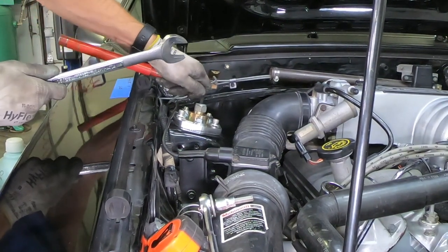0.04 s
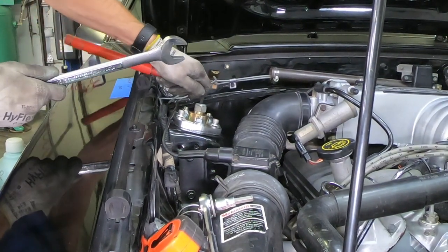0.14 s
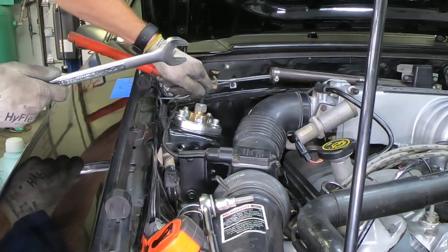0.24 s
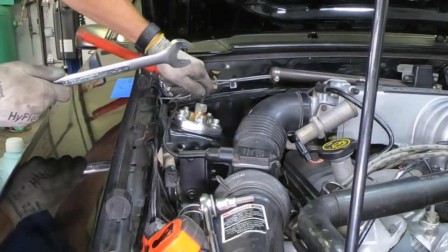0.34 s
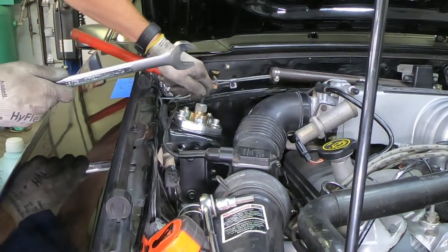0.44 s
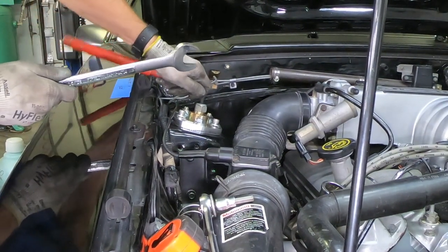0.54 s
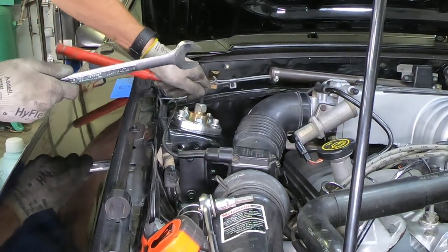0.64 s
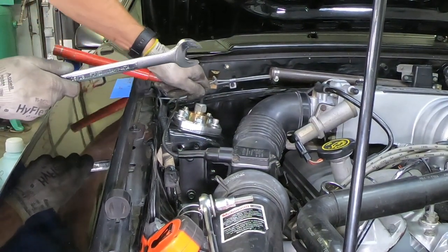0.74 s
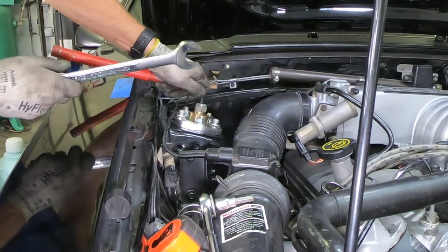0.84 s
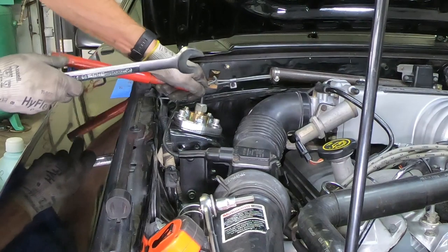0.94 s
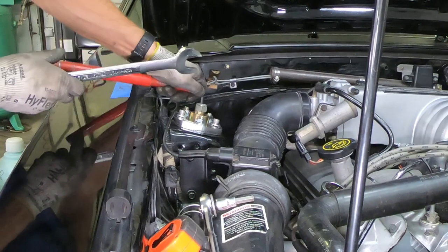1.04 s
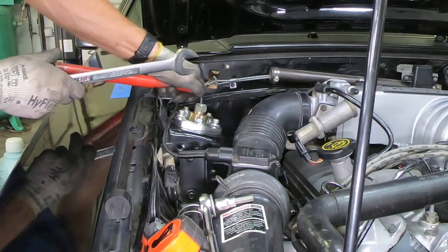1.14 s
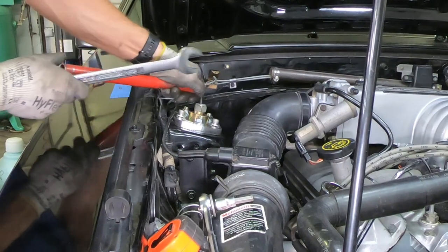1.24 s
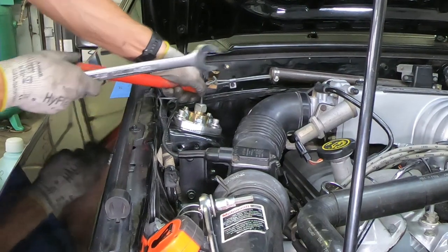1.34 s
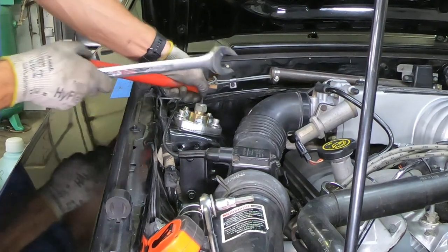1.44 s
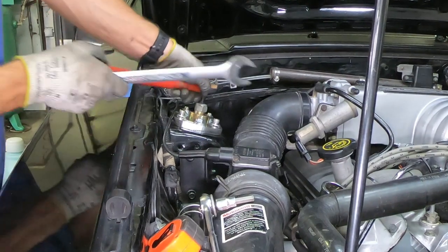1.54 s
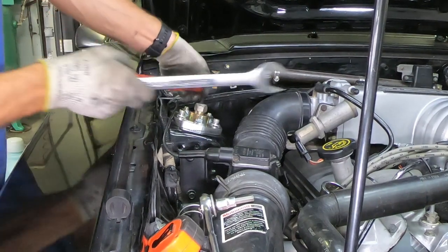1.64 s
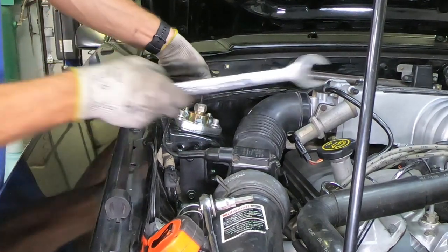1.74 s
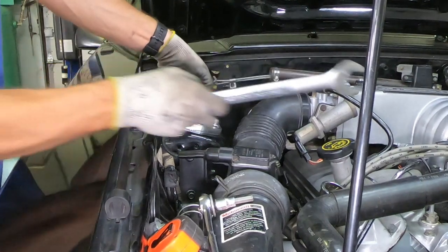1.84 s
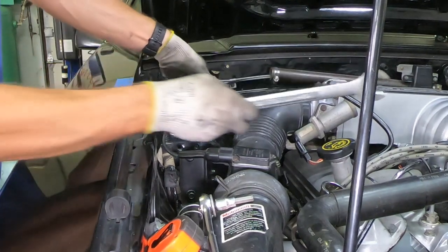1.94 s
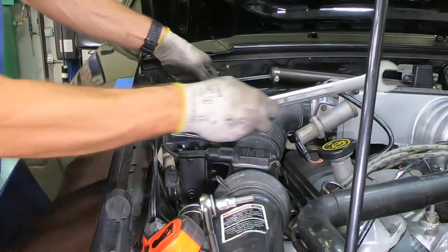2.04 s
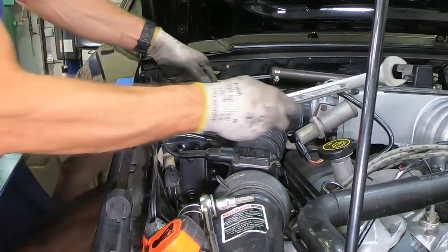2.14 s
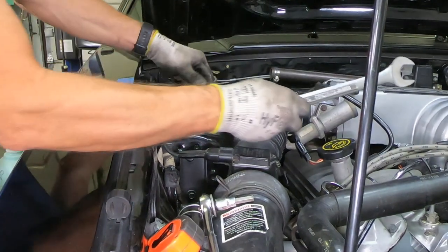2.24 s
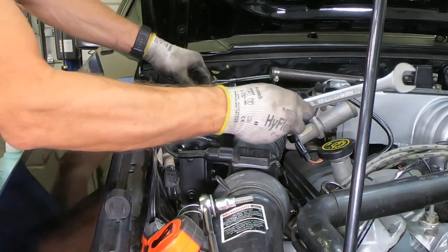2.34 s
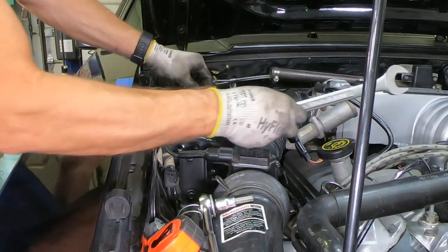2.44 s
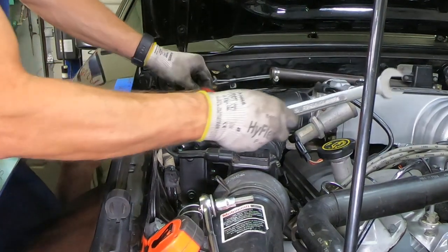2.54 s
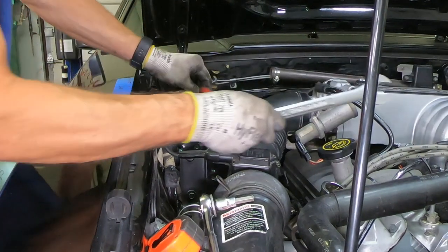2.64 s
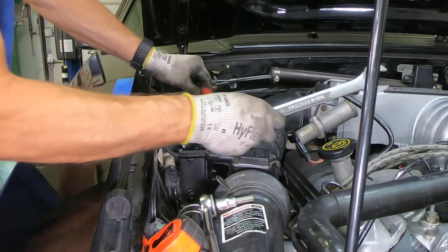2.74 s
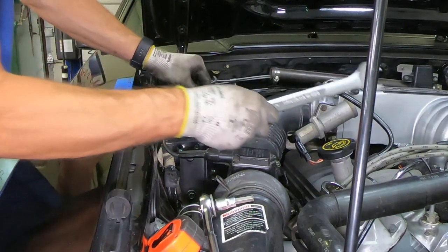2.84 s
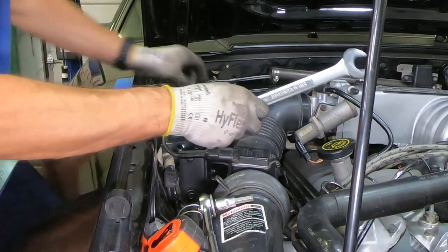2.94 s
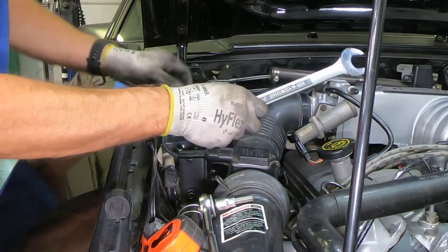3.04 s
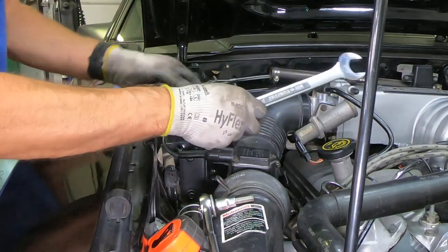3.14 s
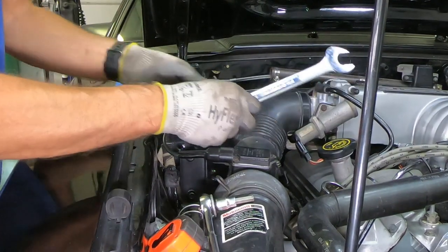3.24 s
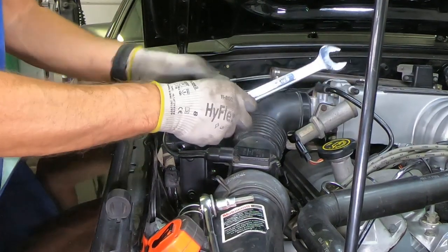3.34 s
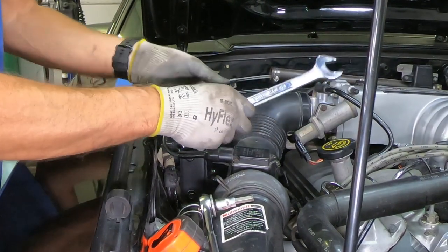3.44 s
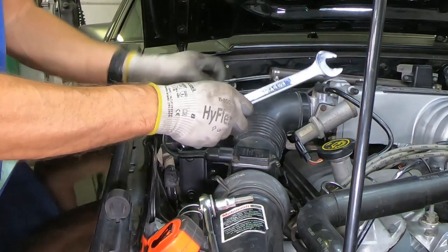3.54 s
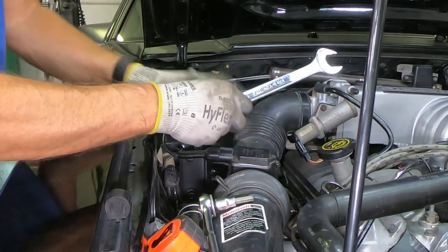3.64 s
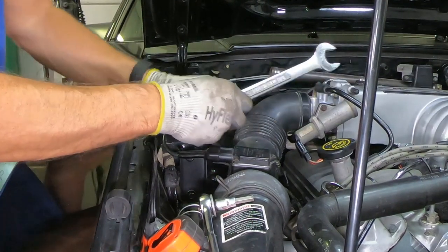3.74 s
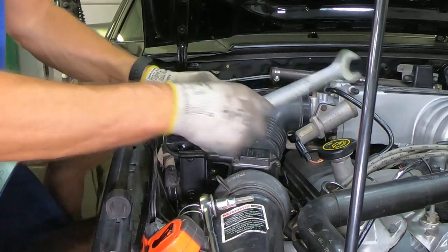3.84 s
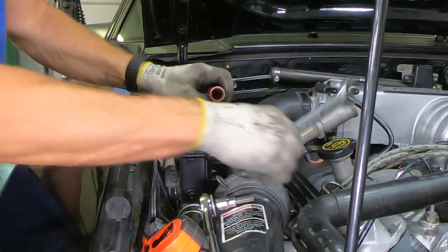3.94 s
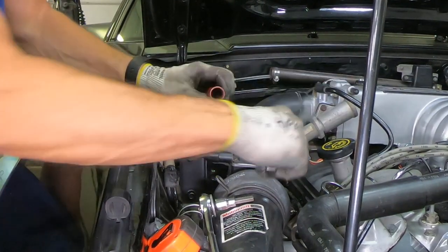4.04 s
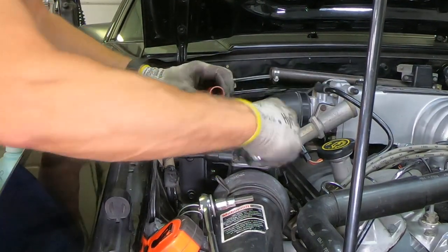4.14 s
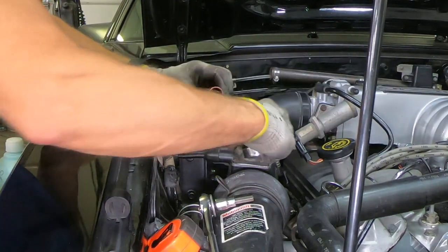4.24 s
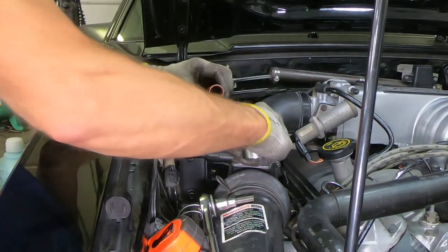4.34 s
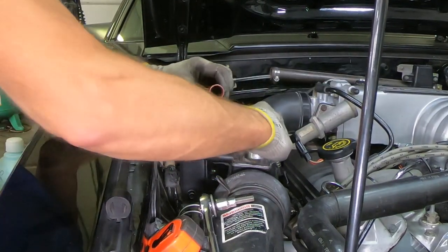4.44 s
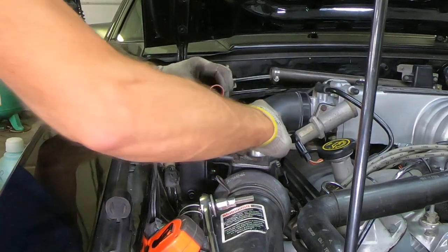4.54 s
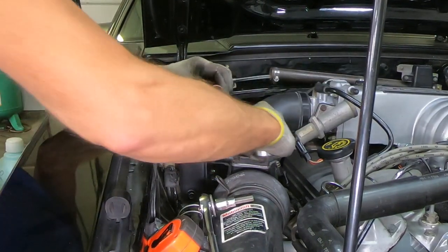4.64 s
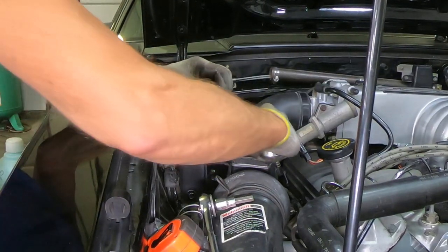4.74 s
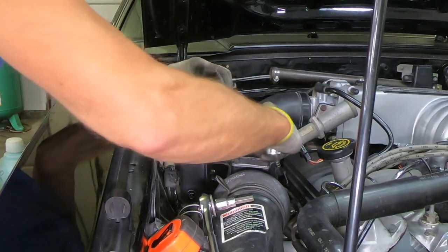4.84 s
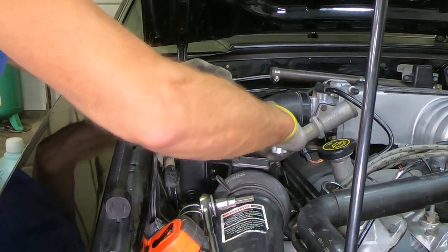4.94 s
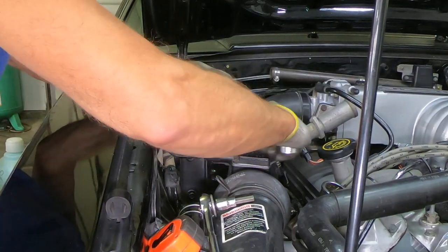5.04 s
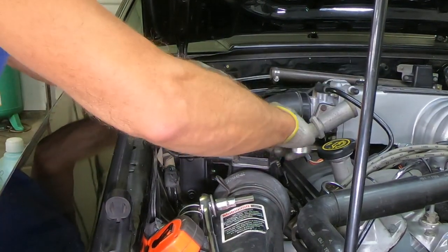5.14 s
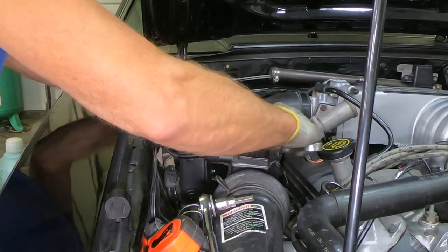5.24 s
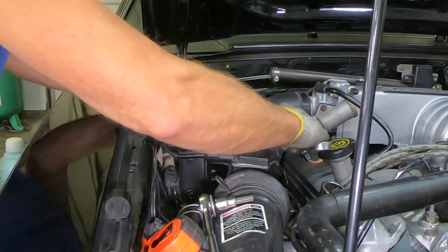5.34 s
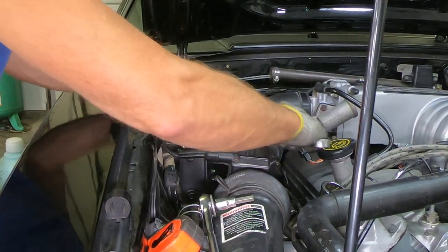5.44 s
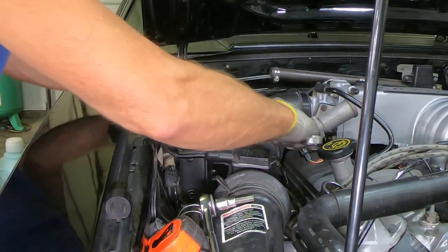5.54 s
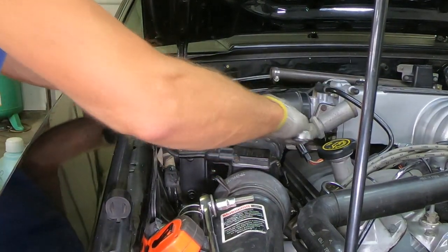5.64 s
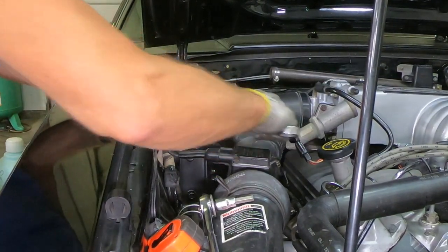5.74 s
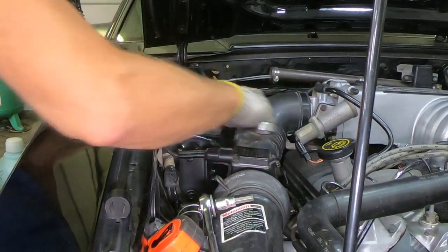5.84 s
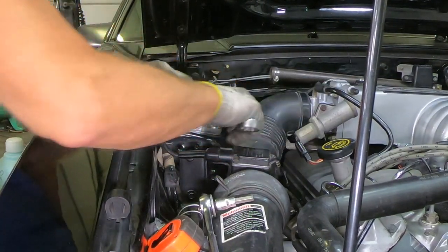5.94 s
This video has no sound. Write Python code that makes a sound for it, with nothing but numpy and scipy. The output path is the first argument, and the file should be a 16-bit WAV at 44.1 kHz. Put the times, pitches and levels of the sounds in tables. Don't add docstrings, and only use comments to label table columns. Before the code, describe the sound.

Over steady electronic hiss and low rumble, a tool lightly touches parts and ratchets briefly, then lands with a soft hollow thud and clear steel clinks. After a sparse stretch of light clinks and cloth rustle, heavy knocks with bracket clang hit among the engine covers, a ratchet clicks, one last strong blow lands and a small clink ends it. Close, nearly mono pickup with tight bay reflections and faint garage reverberation.

```python
import sys
import numpy as np
from scipy import signal
from scipy.fft import rfft, irfft, next_fast_len
from scipy.io import wavfile
from scipy.ndimage import map_coordinates

SR = 44100
rng = np.random.default_rng(int(sys.argv[2]) if len(sys.argv) > 2 else 0)


def put_to_file(sound):
    columns = np.atleast_2d(sound).T
    safe = np.clip(columns, -1, 1)
    whole_steps = np.round(safe * 32767)
    wavfile.write(sys.argv[1], SR, whole_steps.astype(np.int16))


def undo_db(level):
    steps = np.asarray(level, float) / 20
    return 10 ** steps


N = 263718
SPAN = 2 ** 15
HZ = np.fft.rfftfreq(SPAN, 1 / SR)

# (frequency [Hz], width [Hz], level [dB])
HOLLOW = [(214, 56, -4), (352, 68, -3.5), (463.6, 48, 1.5), (688, 263, 1), (980, 330, -7.5)]


def along(points, hz, column=1):
    table = np.transpose(points)
    return np.interp(np.log(hz + 1), np.log(table[0] + 1), table[column])


def noise(spectrum):
    m = next_fast_len(N)
    white = rfft(rng.standard_normal(m))
    gain = undo_db(along(spectrum, np.fft.rfftfreq(m, 1 / SR)))
    x = irfft(white * gain, m)[:N]
    return x / x.std()


def wobble(rate):
    knots = rng.standard_normal(int(N * rate / SR) + 4)
    return map_coordinates(knots, [np.arange(N) * rate / SR])


def resonances(modes):
    response = 0
    for k, (centre, width, db) in enumerate(modes):
        loss = 1j * HZ * abs(width)
        response = response + (-1) ** k * undo_db(db) * loss / (centre ** 2 - HZ ** 2 + loss)
    centres = [mode[0] for mode in modes]
    response = response / (1 + 1j * HZ / (1.68 * max(centres))) ** 2
    response = response * 1j * HZ / (0.23 * min(centres) + 1j * HZ)
    return response / np.sqrt(np.mean(abs(response) ** 2))


def tail(space, frames, gap_s):
    hz, t = np.fft.rfftfreq(256, 1 / SR), np.arange(frames) * 128 / SR
    z = rng.standard_normal((len(hz), frames, 2)) @ [1, 1j]
    t60 = np.maximum(along(space, hz), .02)[:, None]
    level_db = along(space, hz, column=2)[:, None]
    x = signal.istft(z * undo_db(level_db - 60 * t / t60), SR, nperseg=256)[1]
    x = x / np.linalg.norm(x)
    return rfft(np.pad(x, (round(SR * gap_s), 0)), SPAN)


def garage(bay_db, room_db):
    # (frequency [Hz], t60 [s], level [dB])
    bay = [(153, 0.096, -4.5), (970, 0.21, -2), (4000, 0.075, -1), (12100, 0.022, -6)]
    # (frequency [Hz], t60 [s], level [dB])
    room = [(150, 1, -9), (405, 0.51, 9), (1090, 0.78, 5.5), (2370, 0.7, 3.5), (5000, 0.8, -4.5),
            (5470, 0.62, -0.5), (8900, 0.73, -9), (15200, 0.059, 12)]
    return undo_db(bay_db) * tail(bay, 50, .002) + undo_db(room_db) * tail(room, 200, .008)


def add(track, s, parts, bay_db, room_db):
    t = np.arange(SR // 10) / SR
    sound, space = 0, garage(bay_db, room_db)
    for db, body, contact_s in parts:
        onset = 1 - np.exp(-t / (0.00034 + 0.095 * contact_s))
        hold = onset * np.exp(-(t / max(contact_s, .001)) ** 1.08)
        near = rfft(rng.standard_normal(len(t)) * hold, SPAN) * body
        near /= np.linalg.norm(near) / np.linalg.norm(body)
        far = body * space
        sound = sound + undo_db(db) * np.linalg.norm(hold) * (near + far)
    track[max(round(s * SR), 0):][:SPAN] += irfft(sound, SPAN)


def hiss_and_rumble():
    # (frequency [Hz], density [dB per Hz])
    low = [(12, 3), (20, 1.5), (91, -14), (163, -13.5), (210, -25.5), (241, -16), (301, -22)]
    # (frequency [Hz], density [dB per Hz])
    high = [(558, -29.5), (738, -24.5), (1000, -28), (1190, -29), (3840, -26), (12100, -27.5),
            (16000, -27.5)]
    return undo_db(-60.5) * noise(low + high)


def side_hiss():
    # (frequency [Hz], density [dB per Hz])
    difference = [(12, -26), (20, -9), (74, -2), (146, -3), (976, -11), (1860, -11), (14700, -10.5),
                  (16000, -23)]
    return undo_db(-78) * noise(difference)


def whines():
    # (frequency [Hz], rms level [dB])
    steady_tones = [(120, -79), (242.2, -77), (6012, -80.5), (12022, -76.5)]
    comb_hz, comb_db = 888.9, -90.5
    t = np.arange(N) / SR
    tones = 0
    for hz, db in steady_tones:
        level = undo_db(db + 0.9 * wobble(3.91))
        tones = tones + level * np.sin(2 * np.pi * hz * t + .5 * wobble(44))
    drift = .1 * wobble(30)
    comb = sum(np.sin(k * (2 * np.pi * comb_hz * t + k) + drift) for k in range(7, 18))
    return np.sqrt(2) * (tones + undo_db(comb_db) * comb)


def gloves():
    # (time [s], level [dB])
    rustle = [(0.1, -69), (0.516, -71), (1.218, -69.5), (1.46, -67.5), (1.914, -65.5), (2.04, -60.5),
              (2.3, -67.5), (2.58, -66.5), (3.2, -70.5), (3.3, -63.5), (3.6, -66.5), (3.922, -61),
              (4.036, -63.5), (4.16, -71.5), (4.36, -71), (5.17, -64.5), (5.46, -61.5)]
    # (frequency [Hz], density [dB per Hz])
    cloth = [(120, -8.5), (250, -6), (600, -8), (1500, -10.5), (3000, -20), (6000, -27), (12000, -34)]
    s, db = np.transpose(rustle)
    strokes_db = 1.5 * wobble(25)
    return undo_db(np.interp(np.arange(N) / SR, s, db) + strokes_db) * noise(cloth)


def rings():
    # (time [s], frequency [Hz], level [dB], room level [dB])
    hoses = [(0.001, 1770, -45.5, -7), (0.77, 740, -61.5, -5), (1.253, 1520, -54, -14),
             (1.402, 825, -54.5, -6.5), (2.061, 3960, -43.5, -16), (2.072, 490, -47, -5),
             (2.615, 252, -60.5, 3), (2.678, 377, -55, -9), (2.724, 333, -49.5, -8),
             (2.806, 1900, -46.5, -11), (3.301, 1900, -54, 0), (4.398, 2200, -34, -1),
             (4.483, 597, -40.5, -5), (4.903, 2360, -29, -7), (5.463, 1480, -47, -11),
             (5.596, 790, -27, -7), (4.4, 1570, -27, -10), (3.325, 1260, -49, -2)]
    # (time [s], frequency [Hz], level [dB], room level [dB])
    mounts = [(0.001, 4450, -45, -8), (3.322, 4700, -46.5, -6), (4.398, 3700, -26.5, -5),
              (4.398, 4670, -23.5, -7.5), (4.398, 7440, -38, -11), (4.703, 1560, -30.5, -20),
              (4.703, 2230, -46, 0), (4.820, 1616, -31, -6), (4.825, 5300, -46, -14), (4.9, 7400, -47, -8),
              (5.481, 3260, -48, -7), (5.594, 1450, -22, -25), (5.600, 1160, -32.5, 1),
              (5.594, 2600, -28.5, -5.5), (5.594, 4560, -28, -11.5), (5.594, 6940, -31.5, -11.5),
              (5.915, 3370, -36, -11), (2.062, 8400, -41.5, -13)]
    # (time [s], frequency [Hz], level [dB], room level [dB])
    sings = [
        (1.494, 5010, -54, -8),
        (2.946, 1900, -53, -7),
        (2.946, 3390, -54.5, 11),
        (2.946, 6470, -54, -6),
        (3.321, 2380, -51.5, 2.5),
        (3.322, 3330, -51, 1),
        (3.322, 6450, -50, 4),
        (2.946, 13700, -53, -12),
        (4.826, 11800, -52.5, -14),
        (5.918, 7900, -55, -13),
    ]
    shortest_s, cycles = 0.0063, 8.7
    track = np.zeros(N + SPAN)
    for rows, q in ((hoses, 3.4), (mounts, 14.7), (sings, 32)):
        for s, hz, db, room_db in rows:
            body = resonances([(hz, hz / q, 0)])
            contact_s = max(shortest_s, cycles / hz)
            add(track, s, [(db, body, contact_s)], bay_db=-9, room_db=room_db)
    return track[:N]


def ratchet():
    # (frequency [Hz], width [Hz], level [dB])
    pawl = [(1250, 240, 0), (2740, 120, -0.5), (3400, 370, -9.5), (4480, 490, -11)]
    # (start time [s], tooth spacing [s], teeth [count])
    runs = [
        (1.5075, .0159, 7),
        (1.6304, 0, 1),
        (5.1985, 0, 1),
        (5.2314, .0219, 8),
        (5.4025, .0172, 4),
    ]
    run_db = (-49.5, -57, -50, -45.5, -48.5)
    run_fade_db = (0.5, 0, 0, 6, 2)
    run_lower_db = (4, 4, -6, 3, 4)
    scatter_db, late_share = 1.5, .04
    track = np.zeros(N + SPAN)
    upper, lower = resonances(pawl[1:]), resonances(pawl[:1])
    for (start, spacing, teeth), first_db, fade_db, lower_db in zip(runs, run_db, run_fade_db, run_lower_db):
        for k, place in enumerate(np.linspace(0, 1, teeth)):
            late, size = rng.standard_normal(2)
            s = start + spacing * (k + late_share * late)
            db = first_db - fade_db * place + scatter_db * size
            tick = (upper + undo_db(lower_db) * lower) * (1 + garage(bay_db=-12, room_db=-10))
            track[round(s * SR):][:SPAN] += undo_db(db + 10.5) * irfft(tick, SPAN)
    return track[:N]


def clinks():
    # (time [s], peak level [dB], upper ring [Hz], lower ring level [dB], thud level [dB])
    light = [(1.2484, -60, 3230, 10, 2), (1.398, -54, 4550, 3.5, -4), (1.494, -41, 2820, 4.5, -16),
             (2.3446, -59, 2800, 8, -4), (2.4937, -55.5, 3500, -15, -7), (2.5418, -60, 4120, 11.5, 6.5),
             (2.7252, -37.5, 2990, -4.5, -17), (2.806, -48.5, 3950, 10, 0.5), (2.908, -45.5, 4000, 6, -5),
             (2.9246, -40, 3400, -1.5, -2), (2.9434, -30.5, 4380, -7, -6.5), (3.1984, -65.5, 3470, -4, 13),
             (3.3225, -33.5, 4000, -10, -11), (3.4507, -57.5, 2660, 7.5, -5), (3.5116, -52, 2720, 2, -12),
             (3.5342, -54, 2690, 2, -8), (3.6202, -61, 3240, -2, -21), (3.7494, -56.5, 2800, 6, 5),
             (3.8112, -64, 2950, -6, -10), (3.8739, -48, 3820, 4.5, 1), (3.9993, -52.5, 2770, -2, -2),
             (5.9174, -54, 3160, -25.5, -13)]
    ring_ratio = 2.214
    track = np.zeros(N + SPAN)
    hollow = resonances(HOLLOW)
    for s, db, upper_hz, lower_db, thud_db in light:
        upper = resonances([(upper_hz, 350, 0), (3800, 2000, -10)])
        lower = resonances([(upper_hz / ring_ratio, 250, 0), (1700, 1200, -12)])
        parts = [(db - 1, upper, .0035),
                 (db + lower_db - 6, lower, .0045),
                 (db + thud_db - 5.5, hollow, .015)]
        add(track, s, parts, bay_db=-6.0, room_db=-10.5)
    return track[:N]


def jaw_contacts():
    # (time [s], peak level [dB], ring [Hz], top mode level [dB], contact length [s])
    bright = [(1.395, -51.5, 6260, -17, 0.0043), (1.49, -58, 6500, -11, 0.0053),
              (2.722, -34, 7640, -19, 0.0027), (2.804, -60, 6130, -13, 0.006),
              (2.904, -43, 6560, -18, 0.0073), (2.922, -40, 6500, -10, 0.0017),
              (2.9376, -39, 5670, -16, 0.01), (2.9434, -25.5, 6450, -10, 0.0034),
              (3.318, -41, 6340, -8.5, 0.0054), (3.871, -53, 6480, -12, 0.006),
              (5.914, -46.5, 6450, -13, 0.0077)]
    # (frequency [Hz], width [Hz], level [dB])
    shank = [(9660, 1200, 10), (13700, 400, -22)]
    track = np.zeros(N + SPAN)
    top = resonances(shank)
    for s, db, ring_hz, top_db, contact_s in bright:
        jaw = resonances([(ring_hz, 350, 0), (6800, 2500, -12)])
        parts = [(db - 11.5, jaw, contact_s), (db + top_db - 4.5, top, contact_s)]
        add(track, s, parts, bay_db=10, room_db=-1.5)
    return track[:N]


def blows():
    # (time [s], knock [dB], hollow thud [dB], steel [dB], contact length [s])
    laid = [
        (0.0004, -46, -8, -3, 0.011),
        (2.0618, -34.5, 6.5, -2, 0.0083),
        (2.126, -70, 5, -14, 0.0084),
        (2.5988, -46.5, 1.5, -6, 0.019),
        (2.612, -47.5, 9.5, -6, 0.013),
        (2.7426, -55.5, 12, -14, 0.0099),
        (2.827, -51, 2, -16, 0.012),
        (2.943, -38.5, 2.5, -7.5, 0.037),
        (2.972, -45.5, 15.5, -17, 0.0058),
    ]
    # (time [s], knock [dB], hollow thud [dB], steel [dB], contact length [s])
    pushed = [(4.3973, -20, 1.5, 0.5, 0.013), (4.702, -32, 7.5, -8.5, 0.011),
              (4.7204, -37.5, 4, -15, 0.013), (4.8164, -26.5, 0.5, -5, 0.011),
              (4.8212, -28, -0.5, -0.5, 0.021), (4.8994, -20, 3.5, -9.5, 0.0093),
              (4.9115, -36, -2, -7, 0.0081), (5.466, -41, -5, -9, 0.012), (5.481, -40, 0, -11, 0.017),
              (5.506, -47.5, 6, -13, 0.041), (5.5922, -18.5, 3.5, -1, 0.011),
              (5.6092, -31, 16, -15, 0.0035)]
    # (frequency [Hz], width [Hz], level [dB])
    covers = [(1240, 640, 0.5), (1510, 400, 4.5), (1900, 740, -6.5)]
    # (frequency [Hz], width [Hz], level [dB])
    brackets = [(2600, 800, -5), (3460, 450, 0.5), (4000, 390, -2), (4700, 420, -3)]
    # (frequency [Hz], level [dB])
    crack_spectrum = [(4000, -26), (5500, 5), (8000, 3.5), (11000, 0.5), (13000, -3), (16000, -37)]
    crack_growth = 1.8
    track = np.zeros(N + SPAN)
    cover, hollow, bracket = resonances(covers), resonances(HOLLOW), resonances(brackets)
    crack = undo_db(along(crack_spectrum, HZ))
    for rows, crack_db in ((laid, -2), (pushed, -18)):
        for s, db, thud_db, steel_db, contact_s in rows:
            parts = [(db - 7.5, cover, contact_s),
                     (db + thud_db - 9.5, hollow, 0.99 * contact_s),
                     (db + steel_db - 6.0, bracket, 0.88 * contact_s),
                     (db + crack_growth * steel_db + crack_db, crack, 0.77 * contact_s)]
            add(track, s, parts, bay_db=-7.0, room_db=-8)
    return track[:N]


def scene():
    near = blows() + clinks() + jaw_contacts() + rings() + ratchet() + gloves()
    apart = undo_db(-22.5) * np.gradient(near)
    return np.array([near + apart, near - apart])


def top_cut(x):
    return signal.sosfilt(signal.butter(12, 16240, fs=SR, output="sos"), x)


def record(dry):
    own = side_hiss()
    x = dry + hiss_and_rumble() + whines() + [own, -own]
    passed = np.fft.rfftfreq(N, 1 / SR) < 15850
    return top_cut(irfft(rfft(x) * passed, N))


dry = scene()
out = record(dry)
put_to_file(out)
```